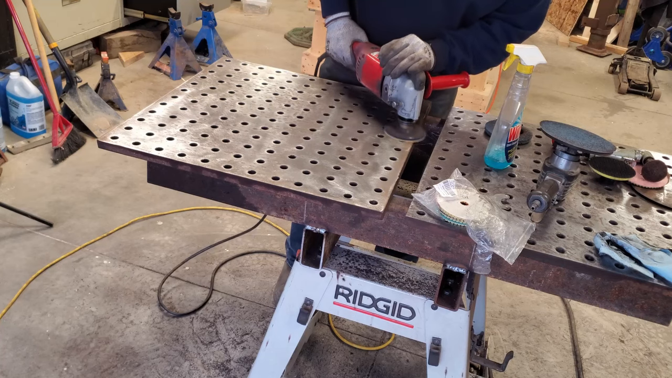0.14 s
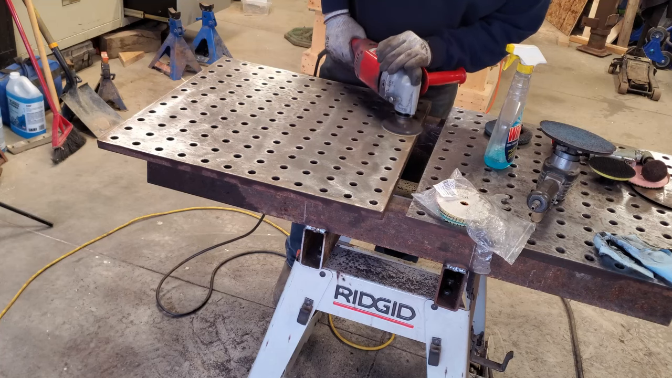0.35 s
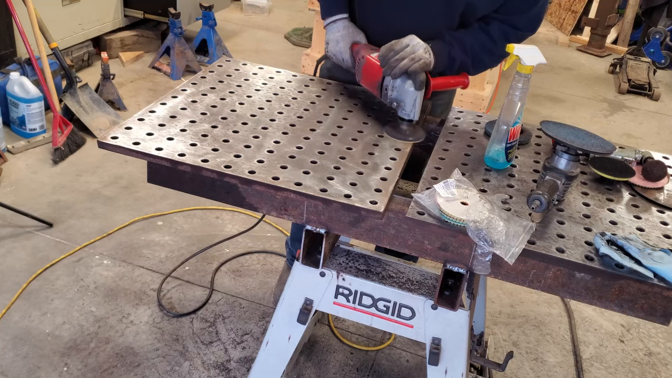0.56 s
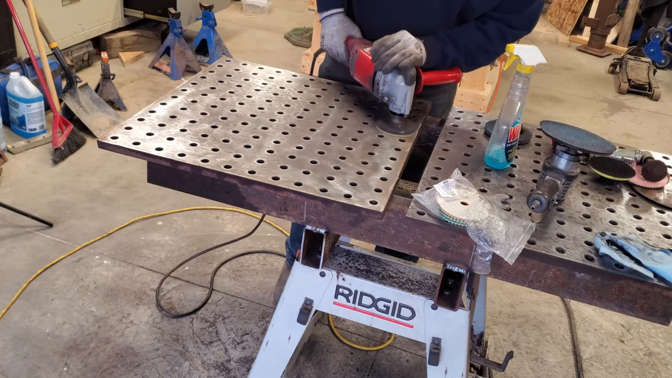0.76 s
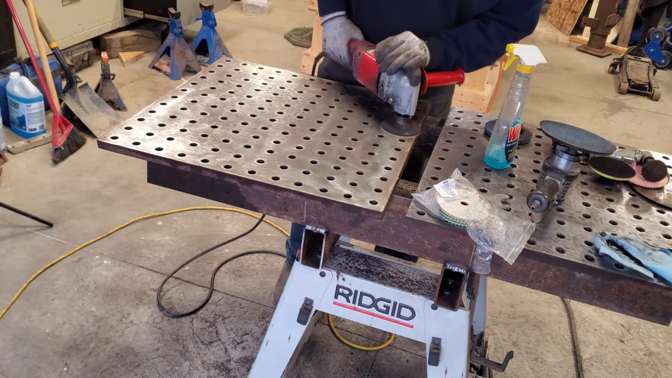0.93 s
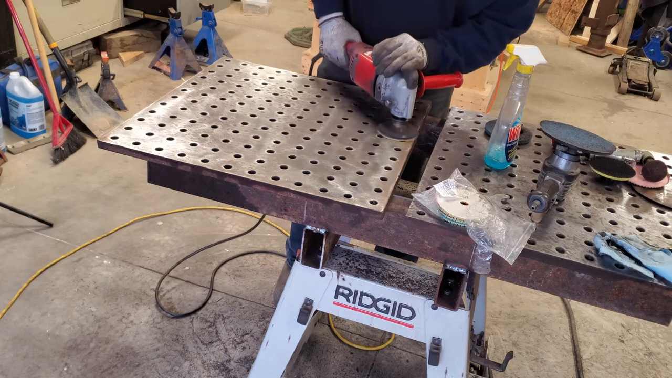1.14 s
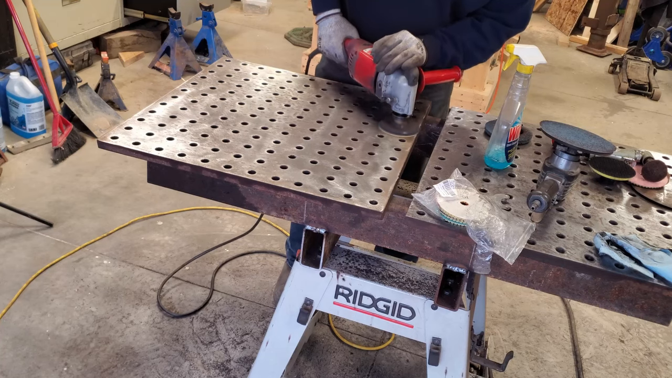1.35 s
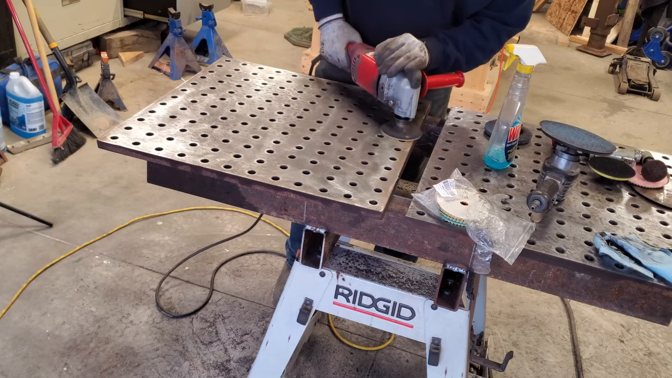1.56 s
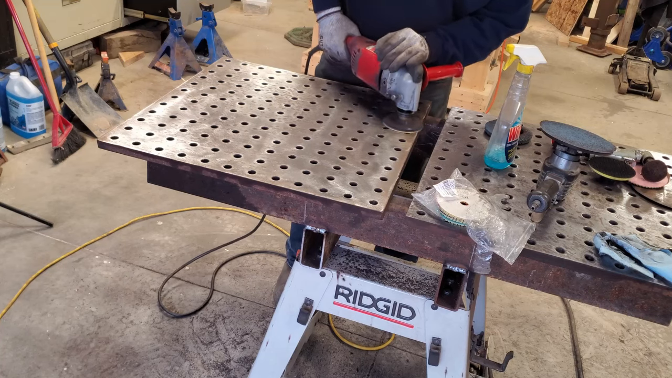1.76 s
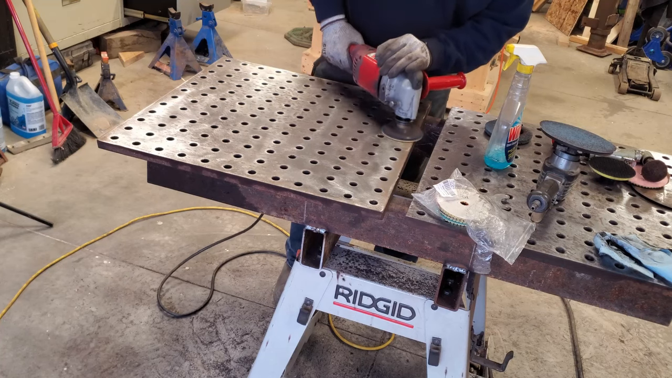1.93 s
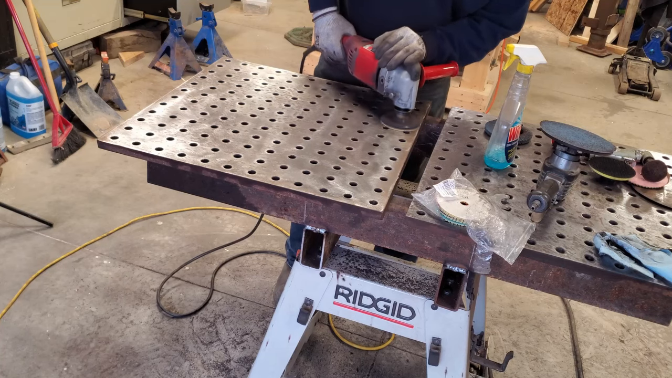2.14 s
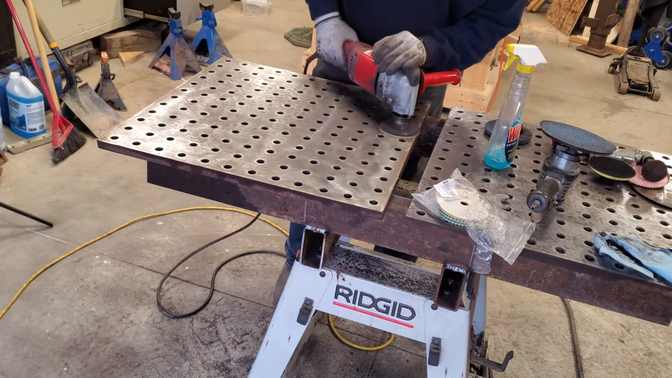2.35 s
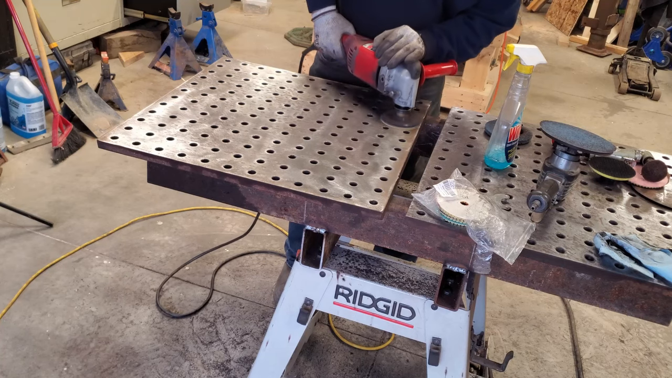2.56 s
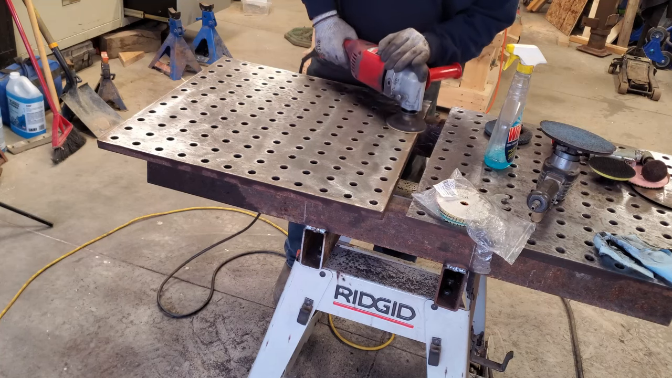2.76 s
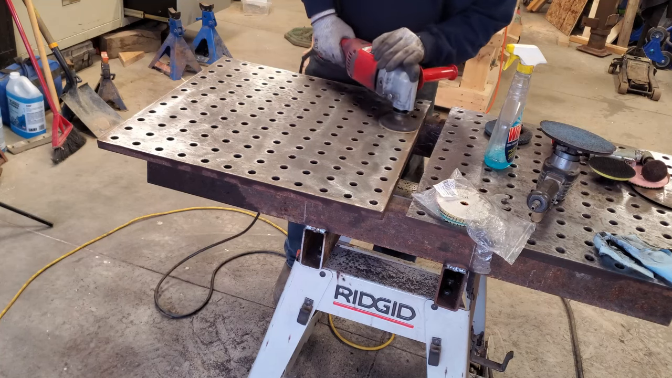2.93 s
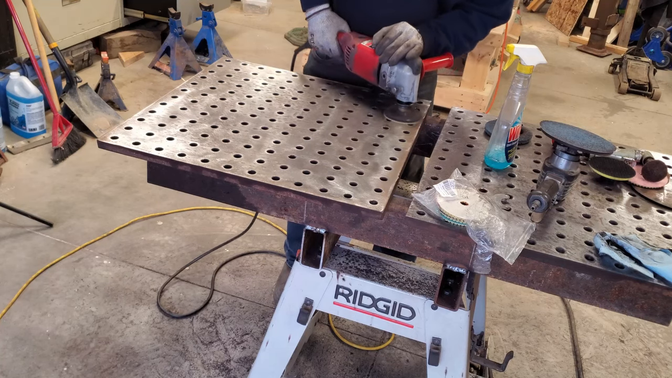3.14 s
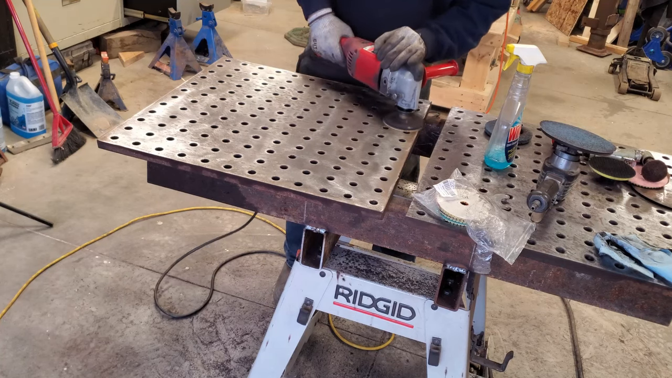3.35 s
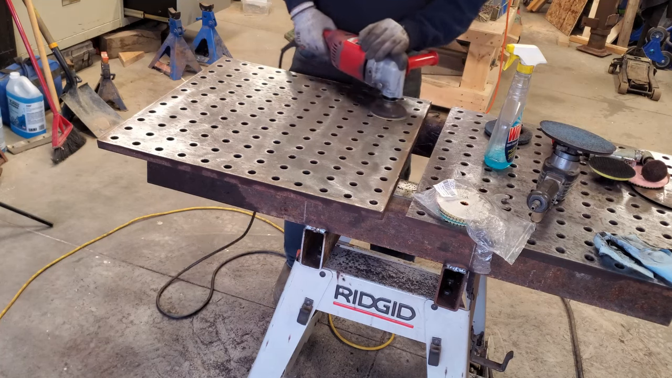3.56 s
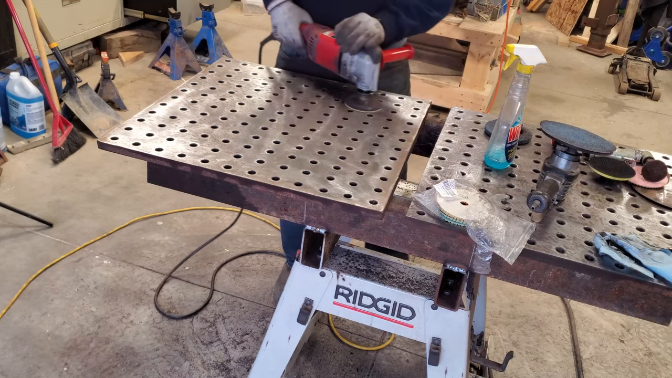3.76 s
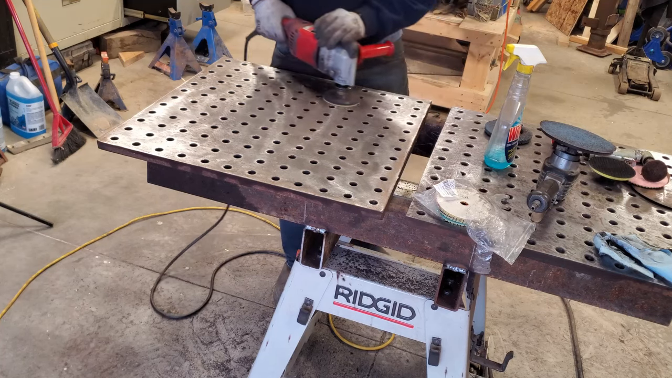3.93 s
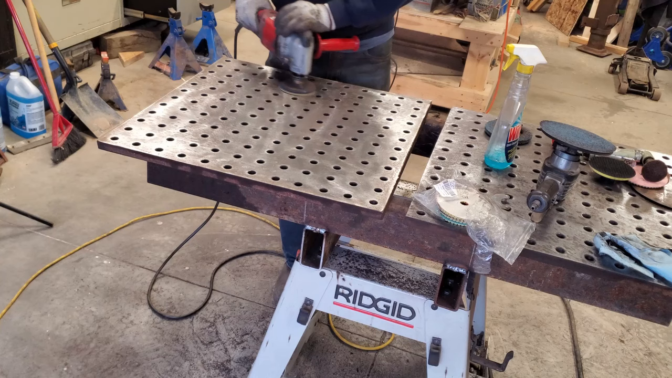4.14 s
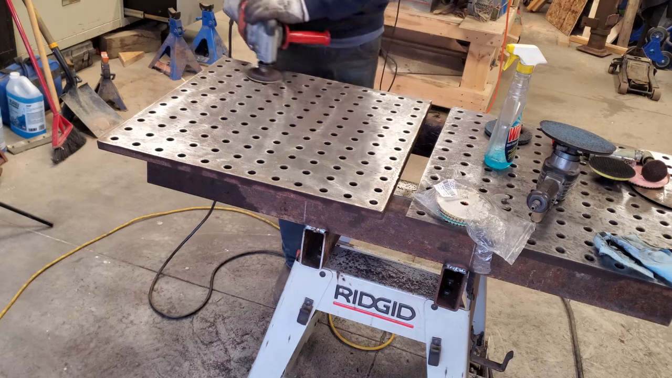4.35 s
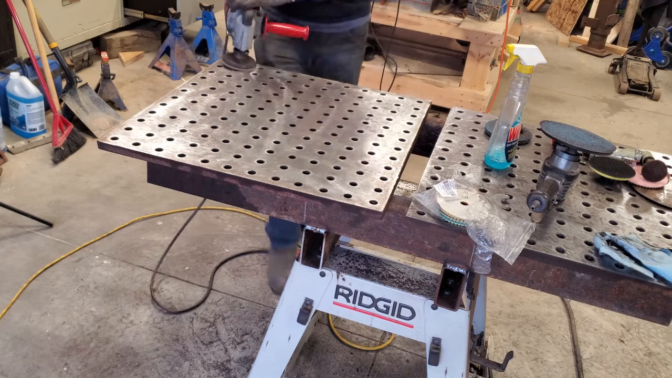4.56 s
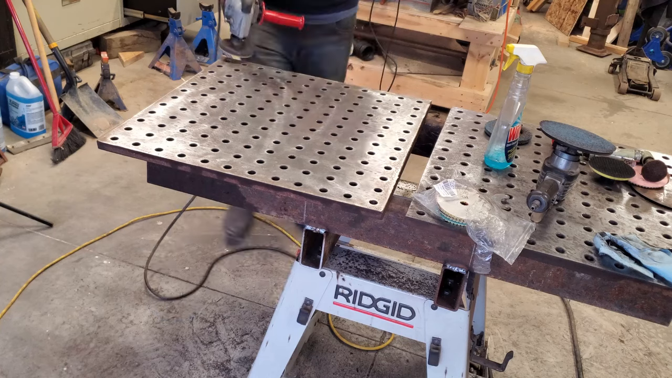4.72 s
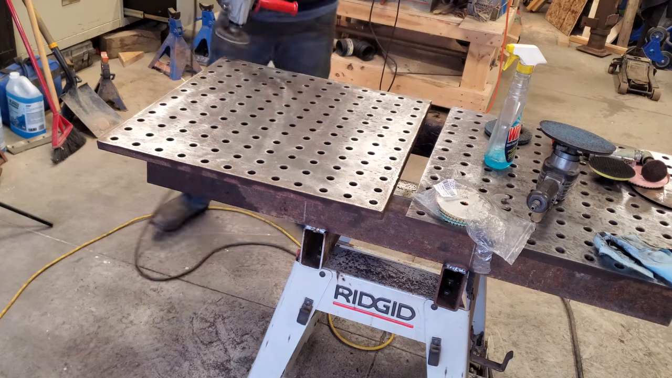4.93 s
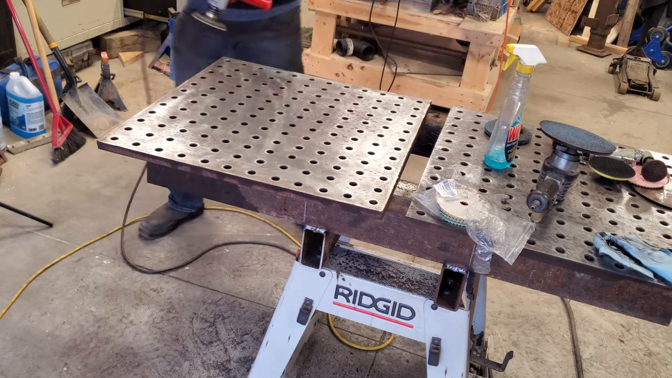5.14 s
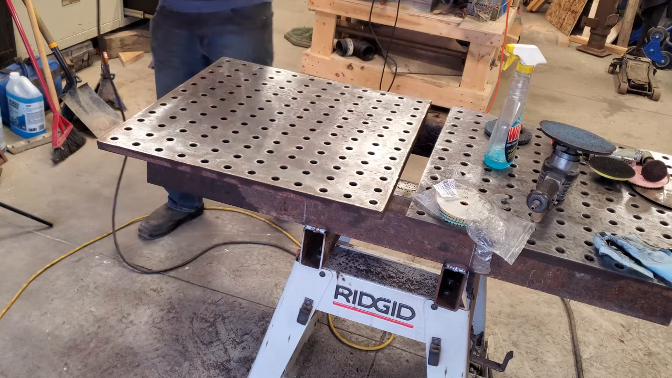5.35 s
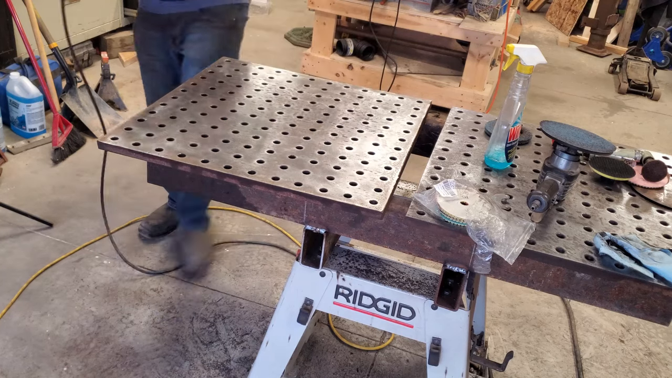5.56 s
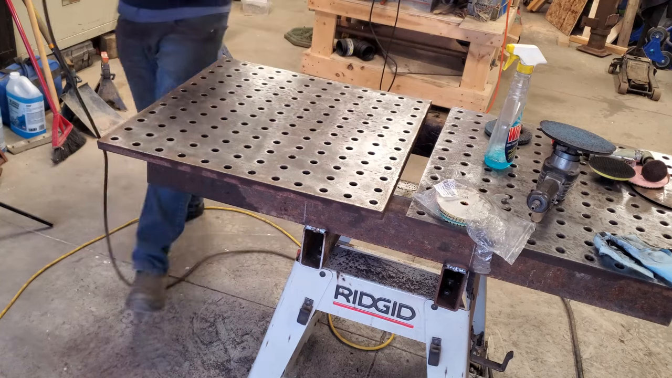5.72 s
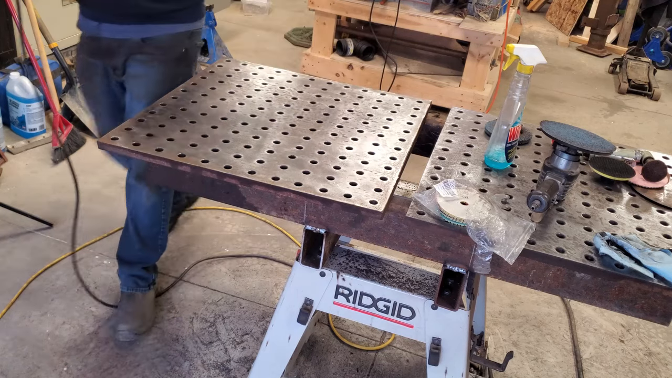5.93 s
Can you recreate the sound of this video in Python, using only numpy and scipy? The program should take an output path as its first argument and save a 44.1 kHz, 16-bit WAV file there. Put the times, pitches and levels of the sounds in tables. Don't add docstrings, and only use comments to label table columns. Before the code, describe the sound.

Close, dense grinding of an abrasive disc on steel fills the first half, rough and hissy, with several whining motor tones on top. Then power is cut: the whine sinks, the scratching brightens briefly and ends as the disc lifts. What remains is a quieter airy whir, buzzing gear rattle and falling motor tones over low workshop rumble. The rubbing leans left in a wide stereo image.

```python
import sys
import numpy as np
from scipy import signal
from scipy.fft import rfft, irfft, next_fast_len
from scipy.io import wavfile
from scipy.ndimage import uniform_filter1d, map_coordinates

SR = 44100
rng = np.random.default_rng(int(sys.argv[2]) if len(sys.argv) > 2 else 0)


def wav_record(signal):
    frames = np.transpose(np.atleast_2d(signal))
    bounded = np.clip(frames, -1, 1)
    quanta = np.round(bounded * 32767).astype(np.int16)
    wavfile.write(sys.argv[1], SR, quanta)


def convert_level_to_amplitude(level_db):
    exponent = np.asarray(level_db, float) / 20
    return 10 ** exponent


N = 268555

OFF_S = 3.48
REDUCTION = 8

# [t/s, rotor turns f/Hz]
SPEED = [(0.0, 575.4), (0.5, 576), (1.5, 574), (1.68, 576), (1.8, 574), (1.95, 566.3), (2.25, 559),
         (2.5, 555.3), (2.8, 554), (3.1, 546), (3.25, 545.4), (3.35, 539), (3.48, 537)]
# [f/Hz, wander/Hz, relative pitch shift in the new grip]
HOUSING = [(1960, 50, -.02), (2270, 60, .035), (2920, 50, 0), (3500, 80, .01)]
# [f/Hz, left-right likeness]
ALIKE = [(60, 0.59), (130, 0.65), (290, 0.82), (640, 0.71), (1400, 0.38), (3100, 0.34), (6800, 0.26),
         (15000, 0.28)]
# [f/Hz, left minus right level/dB]
LEAN = [(60, -3), (110, 2.5), (200, 2.5), (380, 3.0), (700, 4), (1290, 6), (2380, 4.5), (4400, 8.5),
        (8120, 1), (15000, -2)]
# [f/Hz, left lead/rad]
LEAD = [(0, 0), (950, 0.2), (2070, -0.7), (2330, -1.2), (2580, -0.8), (3450, -1.0), (4050, -0.5),
        (6550, -3.1), (7750, -2.7), (9390, -3.2), (10200, -2.8), (12400, -4.2), (14600, -3.7),
        (16000, -4.1)]
NEAR = (ALIKE, LEAN, LEAD)


def rubbing():
    # [t/s, pressure level/dB, bite level/dB]
    strokes = [(0, 0.5, 0), (.6, 0, 1.5), (.85, 0, 0), (1.5, 0, 0.5), (1.55, 1.5, -1), (1.7, 0, 0),
               (3.3, -0.5, 0), (3.51, 1, -1), (3.6, 0, 2), (3.72, -0.5, 0.5), (3.99, -2, 4),
               (4.37, -3, -0.5), (4.5, -5, 1.5), (4.62, -6.5, 0), (4.68, -7.5, -12), (4.75, -13, -17)]
    # [f/Hz, density level/dB per Hz]
    steel_colour = [(120, -57), (200, -39), (240, -16.5), (360, -14.5), (690, -9.5), (900, -5), (1520, -9),
                    (2230, -4.5), (2630, -6.5), (3340, -4.5), (6200, -9.5), (8000, -15.5), (12700, -11.5),
                    (15700, -16.5)]
    # [f/Hz, width/Hz, rise/dB]
    plate_modes = [(459, 13, 5), (615, 9.2, 9), (765, 40, 3.5), (816, 33, 11), (866, 50, -3), (964, 30, -3),
                   (986, 18, 7), (1407, 35, 6), (1870, 110, 3), (2350, 120, 3), (3280, 810, 1.5)]

    def steel(lo_hz, hi_hz, shift=1):
        def gain(hz):
            modes = sum(db * peak(centre, width)(hz / shift) for centre, width, db in plate_modes)
            return convert_level_to_amplitude(along(steel_colour, hz) + modes) * band(lo_hz, hi_hz)(hz)
        return gain

    pressure_db, bite_db = curves(strokes)
    plate_db = -35 + pressure_db
    scrape_db = -27.5 + pressure_db
    hiss_db = -33 + pressure_db + bite_db
    lifted_db = curves([(4.62, 0), (4.74, -2.5), (4.9, -16)])[0]
    edge = np.clip(curves([(2.9, 0), (3.6, .8), (4.1, .6), (4.5, 1)])[0], 0, 1)
    disc = np.cos(2 * np.pi * np.cumsum(rotor()) / SR / REDUCTION + 1.2 * wobble(3.5))

    middle = np.sqrt(1 - edge) * rush(steel(150, 1325), NEAR, patchy_db=0.4)
    rim = np.sqrt(edge) * convert_level_to_amplitude(-0.65) * rush(steel(280, 1480, 1.05), NEAR, patchy_db=0.6)
    plate = convert_level_to_amplitude(plate_db + .4 * disc) * (middle + rim)
    scrape = rush(steel(1453, 6800), NEAR, patchy_db=0.78, grit_db=1.0)
    scrape = convert_level_to_amplitude(scrape_db - 1.33 + 0.31 * disc) * scrape
    hiss = rush(steel(6520, 17400), NEAR, patchy_db=1.0, grit_db=1.5)
    hiss = convert_level_to_amplitude(hiss_db + .5 * disc + 0.57 * wobble(24.85)) * hiss
    return convert_level_to_amplitude(lifted_db + 0.24 * wobble(9.9)) * (plate + scrape + hiss)


def whine():
    # [full-speed level/dB, change off the steel/dB]
    rotor_lines = [
        (-59.5, 3.5),
        (-44.5, -1),
        (-41, -19),
        (-43.5, -1),
    ]
    # [t/s, rise/dB, half length/s]
    flares = [
        [(.11, 10, .06), (.5, 6, .1), (.77, 13, .07), (1.7, 11, 0.14), (1.98, 9, .1), (2.3, 15, 0.34),
         (3.45, 7, 0.23), (4.28, 13, 0.22), (5.92, 22, 0.32)],
        [(.42, 8.5, 0.1), (.88, 6, 0.23), (1.27, 7, 0.09), (1.76, 9.5, 0.16), (2.2, 8, 0.18),
         (2.69, 12.5, 0.16), (3.17, 10.5, 0.14), (3.71, 7, 0.04), (5.57, 7, .12)],
        [(.13, 2, 0.092), (.83, -0.5, 0.13), (1.54, -5, .07), (1.98, 4, .06), (2.75, 1, 0.055), (2.86, -9, .05),
         (3.3, -9, .2), (3.88, -12, 0.098), (4.12, 10, 0.079)],
        [(.33, 6.5, .06), (.66, 6.5, .1), (.88, 4, 0.073), (1.3, 2, 0.36), (2.28, 5.5, 0.13), (2.75, 4, 0.048),
         (2.86, -13, 0.052), (3.41, -10, 0.061), (3.71, 3.5, 0.046), (4.85, 2, .25)],
    ]
    # [full-speed level/dB, swells as [t/s, rise/dB, half length/s]]
    gear_lines = [
        (-58, [(.08, 6, .09), (.52, 16, .1), (.88, 25, 0.097), (1.37, 18, 0.21), (1.8, 22.5, 0.14), (2.05, 19, .11), (2.55, 15, .11), (2.97, 15, 0.07), (3.25, 20, .11), (3.9, 13, .25)]),
        (-49, [(.17, 4, .12), (.52, 6, 0.12), (.8, 7, .1), (1.1, 3, .06), (1.37, 4, 0.14), (1.65, 3, .06), (1.8, -12, .09), (2.86, 6, 0.044), (2.97, -12, .05), (3.41, -12, .05), (3.63, -16, 0.044), (3.95, 7, .2)]),
    ]
    # [order, full-speed level/dB]
    faint_lines = [(3.25, -58), (4.85, -59), (5, -54), (10.7, -59), (14, -59)]
    teeth = 43

    speed = rotor()
    turns = np.cumsum(speed) / SR
    fading_db = 45 * np.log10(speed / speed[0])
    fading_db += curves([(OFF_S, 0), (OFF_S + .3, -3)])[0]
    off_steel = curves([(4.55, 0), (4.72, 1)])[0]
    coasting_down = speed < SPEED[-1][1]

    def flash_db(order):
        return coasting_down * sum(7 * peak(hz, 130)(order * speed) for hz, *_ in HOUSING)

    lines = []
    for order, (db, loss_db), rows in zip((2, 4, 6, 7), rotor_lines, flares):
        lines.append((order, db + loss_db * off_steel + swells(rows)))
    for order, (db, rows) in zip((teeth / REDUCTION, REDUCTION), gear_lines):
        lines.append((order, db + swells(rows)))
    for order, db in faint_lines:
        lines.append((order, db + 3 * wobble(3.34)))

    out = 0
    for order, db in lines:
        level_db = db + fading_db + 1 + flash_db(order) + 1.2 * wobble(22)
        out = out + tone(order * turns, level_db, lean_db=5, flutter_db=2.4)
    return out


def rotor():
    coast_s = 2.76
    since_off = np.maximum(np.arange(N) / SR - OFF_S, 0)
    return curves(SPEED)[0] * np.exp(-since_off / coast_s)


def rattle():
    # [base level/dB, swells as [t/s, rise/dB, half length/s]]
    clatter = [
        (-52, [(3.65, 4, .35), (4.15, 10.5, 0.26), (4.6, 5, .12), (4.92, -16, .17), (5.36, 8.5, .11), (5.6, 3, .06)]),
        (-47.5, [(3.47, 8, 0.092), (4.3, 12, 0.19), (4.6, 9, 0.11), (5.0, 3, .06), (5.13, -5, .08), (5.4, 3, 0.063), (5.68, 7.5, .12), (5.93, 7, 0.16)]),
        (-45.5, [(3.68, 5.5, 0.14), (4.75, -14, .11), (5.06, 6.5, 0.13), (5.92, 0, 0.081)]),
        (-56, [(3.68, 11, .13), (3.98, 4, 0.26), (5.0, 13, .06), (5.62, 16, .07), (5.8, 14, 0.055), (6.02, 12, .08)]),
    ]
    loose_db = curves([(3.3, -40), (3.5, -5), (3.8, -4), (4.1, -6), (4.7, -4.5), (4.9, -5.5)])[0]
    regrip = curves([(5.2, 0), (5.6, 1)])[0]
    out = 0
    for (hz, wander_hz, shift), (base_db, rows) in zip(HOUSING, clatter):
        db = base_db + swells(rows)
        for side in (-1, 0, 1):
            pitch = hz * (1 + shift * regrip) + wander_hz * (.9 * side + .5 * wobble(90))
            out = out + tone(np.cumsum(pitch) / SR, db + loose_db, lean_db=5.5, flutter_db=3)
    return out


def coasting():
    # [f/Hz, density level/dB per Hz]
    fan_colour = [(120, -55), (220, -23.5), (500, -18), (900, -10.5), (1400, -15.5), (2300, -8.5),
                  (3600, -9.5), (3900, -14.5), (5200, -15), (6600, -19), (7700, -23), (9200, -15.5),
                  (13500, -13), (15700, -19.5)]
    # [t/s, f/Hz, level/dB]
    handle_hum = [
        (5.2, 265, -82),
        (5.33, 268, -59),
        (5.6, 266.8, -59.5),
        (5.8, 268.4, -57),
        (5.9, 267.5, -85),
    ]
    # [f/Hz, left-right likeness]
    alike_away = [(60, 0.75), (130, 0.79), (290, 0.77), (640, 0.63), (1410, 0.22), (3100, 0.14),
                  (6820, -0.37), (15000, -0.01)]
    # [f/Hz, left minus right level/dB]
    lean_away = [(60, 1.0), (110, 0.5), (200, 3.0), (380, 3.2), (700, 5.4), (1290, 5.8), (2380, 4.8),
                 (4400, 9.7), (8120, 2.5), (15000, 0.5)]
    # [f/Hz, left lead/rad]
    lead_away = [(100, 0), (1000, .4), (7000, 1.5)]
    away = (alike_away, lean_away, lead_away)

    def fan(lo_hz, hi_hz):
        return lambda hz: convert_level_to_amplitude(along(fan_colour, hz)) * band(lo_hz, hi_hz)(hz)

    fan_db = -40 + curves([(4.5, 10), (4.75, 0)])[0] + .8 * wobble(9)
    brush_db = -55.5 + curves([(4.63, 15), (4.75, 0)])[0] + .9 * wobble(14)
    free_db = curves([(4.3, -10), (4.62, -2.5), (4.74, 7)])[0]
    air = convert_level_to_amplitude(fan_db - 2.5) * rush(fan(150, 7630), away, patchy_db=1.4, grit_db=1.0)
    brushes = convert_level_to_amplitude(brush_db) * rush(fan(7200, 17000), away, patchy_db=.7, grit_db=2)
    hum_hz, hum_db = curves(handle_hum)
    hum = tone(np.cumsum(hum_hz + 12 * wobble(20)) / SR, hum_db, lean_db=3, flutter_db=3)
    return convert_level_to_amplitude(free_db) * (air + brushes) + hum


def shop():
    # [t/s, rise/dB, half length/s]
    stand_pushes = [(.2, 12, .15), (1.15, 10, .1), (1.72, 13, .14), (2.05, 16, 0.19), (2.52, 14, .1),
                    (2.92, 17, .16), (3.34, 11, 0.093), (4.33, 9, .2), (5.04, 8, 0.099), (5.45, 13, .3),
                    (6.09, 11, 0.18)]
    # [t/s, rise/dB, half length/s]
    weight_shifts = [(0, 7, 0.066), (.25, 8, .15), (1.41, 8, .08), (2.03, 5, .1), (2.68, 9, .12),
                     (3.34, 6, .08), (4.5, 4, 0.35), (5.05, 11, 0.082), (6.0, 9, .25)]
    # [f/Hz, density level/dB per Hz]
    rumble_colour = [(12, -30), (20, -3), (45, 6), (100, 1), (125, -38)]
    # [f/Hz, density level/dB per Hz]
    air_colour = [(53, -37), (90, -9), (118, -7), (194, -6), (260, -3.5), (340, -24), (570, -120)]

    hum_db = -74.5 + swells(stand_pushes) - 2 + 2 * wobble(12)
    hum = tone(np.cumsum(70 + 8 * wobble(30)) / SR, hum_db, lean_db=.9, flutter_db=2.5)
    rumble = rush(lambda hz: convert_level_to_amplitude(along(rumble_colour, hz)), NEAR, patchy_db=-2.0)
    rumble = convert_level_to_amplitude(-78 + swells(weight_shifts)) * rumble
    air = rush(lambda hz: convert_level_to_amplitude(along(air_colour, hz)), NEAR, patchy_db=0.9)
    air = convert_level_to_amplitude(-63 + 1.5 + 1.2 * wobble(7)) * air
    return hum + rumble + air


def rush(gain, place, patchy_db, grit_db=0):
    grains = rng.standard_normal((2, N)) * convert_level_to_amplitude(grit_db * rng.standard_normal(N))
    z = signal.stft(grains, nperseg=512)[2]
    field = uniform_filter1d(rng.standard_normal(z.shape[1:]), 6, 0)
    field = uniform_filter1d(field, 12, 1)
    pair = signal.istft(z * convert_level_to_amplitude(patchy_db * field / field.std()), nperseg=512)[1]
    size = next_fast_len(N + 8192)
    hz = np.fft.rfftfreq(size, 1 / SR)
    alike, lean, lead = (along(table, hz) for table in place)
    turn = np.arccos(np.clip(alike, -1, 1)) / 2
    left = convert_level_to_amplitude(lean / 2) * np.exp(.5j * lead)
    centre = np.hypot(abs(left + 1 / left) * np.cos(turn), abs(left - 1 / left) * np.sin(turn))
    same, apart = rfft(pair, size) * [np.cos(turn), np.sin(turn)] * gain(hz) / centre
    out = irfft([left * (same + apart), (same - apart) / left], size)[:, :N]
    return out / out.mean(axis=0).std()


def tone(turns, db, lean_db, flutter_db):
    drift = .5 * wobble(20) + .2 * np.array([wobble(3), wobble(3)])
    fade = flutter_db * np.array([wobble(14), wobble(15)]) + [[lean_db / 2], [-lean_db / 2]]
    return np.sqrt(2) * convert_level_to_amplitude(db + fade) * np.sin(2 * np.pi * turns + drift)


def swells(rows):
    t = np.arange(0, N + 64, 64) / SR
    rise_db = sum(db * np.exp(-((t - s) / half) ** 2) for s, db, half in rows)
    return np.interp(np.arange(N) / SR, t, rise_db)


def curves(rows):
    s, *cols = np.transpose(rows)
    return [np.interp(np.arange(N) / SR, s, c) for c in cols]


def wobble(rate):
    coarse = np.arange(0, N + 32, 32)
    knots = rng.standard_normal(int(N * rate / SR) + 4)
    return np.interp(np.arange(N), coarse, map_coordinates(knots, [coarse * rate / SR]))


def along(points, hz):
    f, v = np.transpose(points)
    return np.interp(np.log(hz + 1), np.log(f + 1), v)


def band(lo_hz, hi_hz):
    return lambda hz: np.sqrt(1 / (1 + (lo_hz / (hz + 1)) ** 20) / (1 + (hz / hi_hz) ** 20))


def peak(centre_hz, width_hz):
    return lambda hz: 1 / (1 + (2 * (hz - centre_hz) / width_hz) ** 2)


def scene():
    return rubbing() + whine() + rattle() + coasting() + shop()


def band_limit(x):
    return signal.sosfilt(signal.butter(12, 15730, fs=SR, output="sos"), x)


def record(dry):
    hz = np.fft.rfftfreq(N, 1 / SR)
    port = convert_level_to_amplitude(-7 * peak(7650, 1000)(hz)) * (hz < 15730)
    mix = irfft(rfft(dry) * port, N)
    return band_limit(mix)


dry = scene()
out = record(dry)
wav_record(out)
```